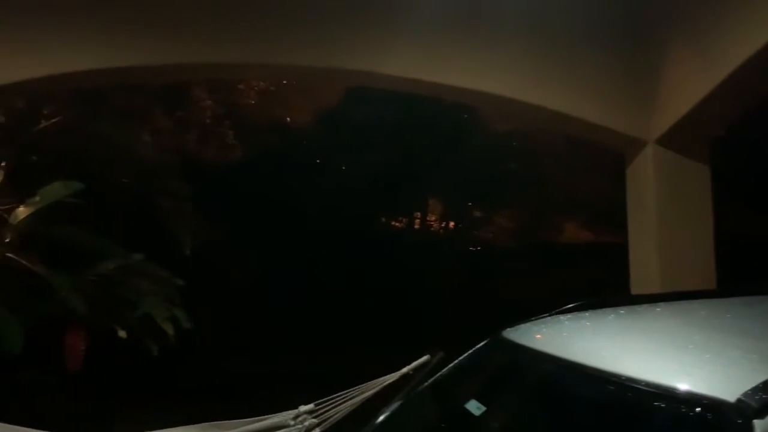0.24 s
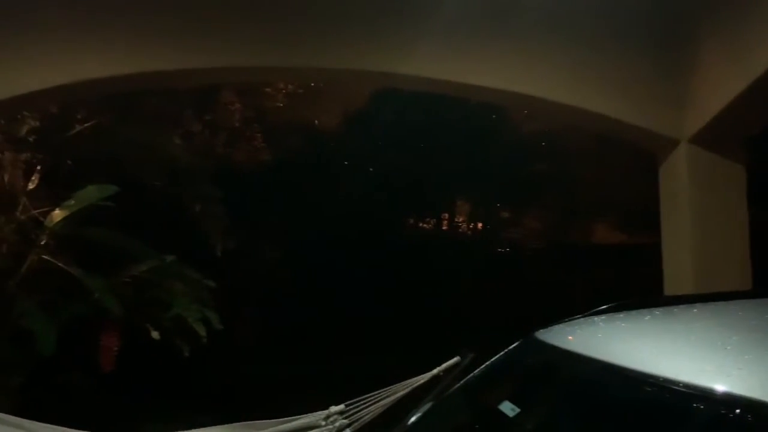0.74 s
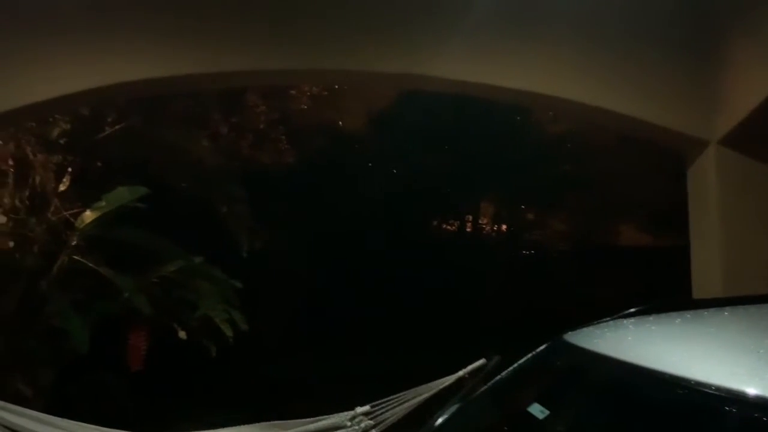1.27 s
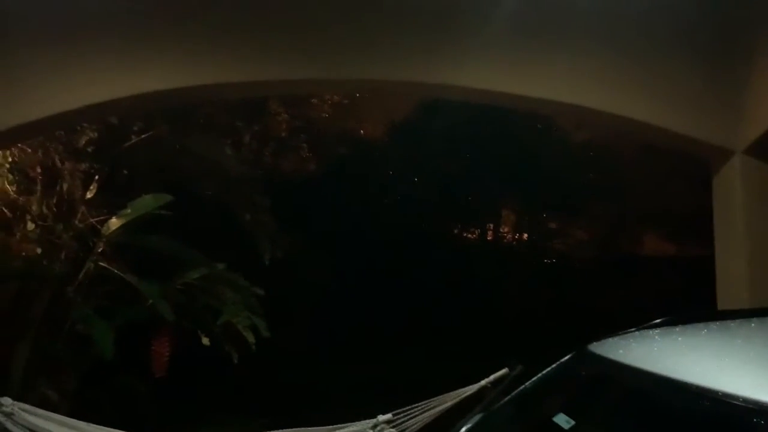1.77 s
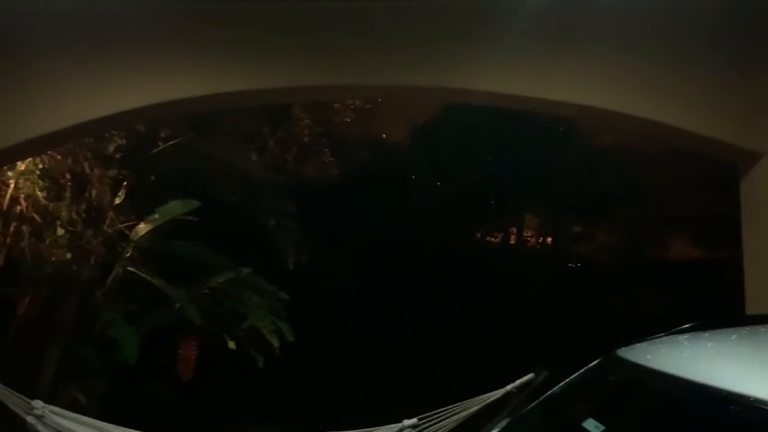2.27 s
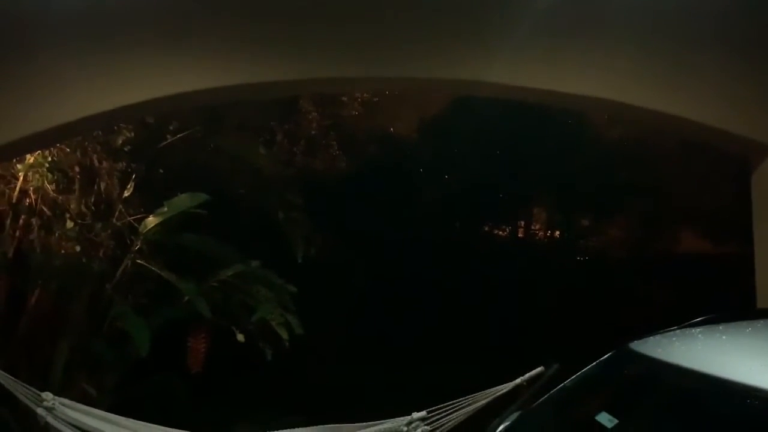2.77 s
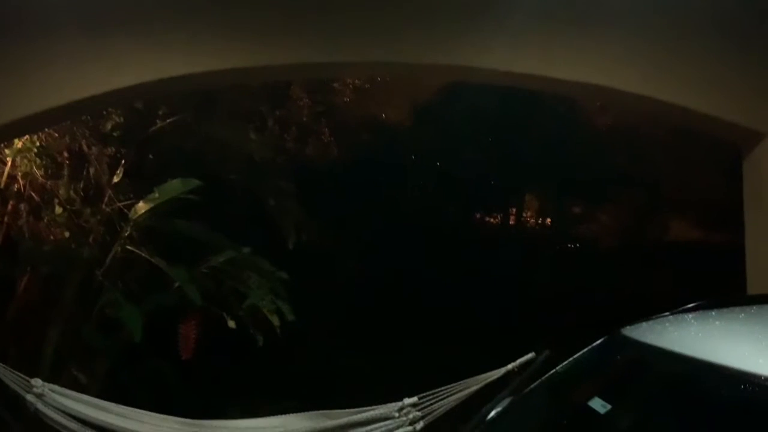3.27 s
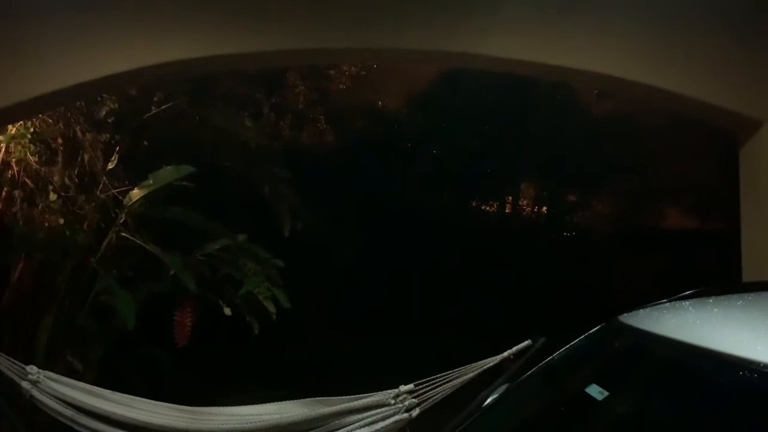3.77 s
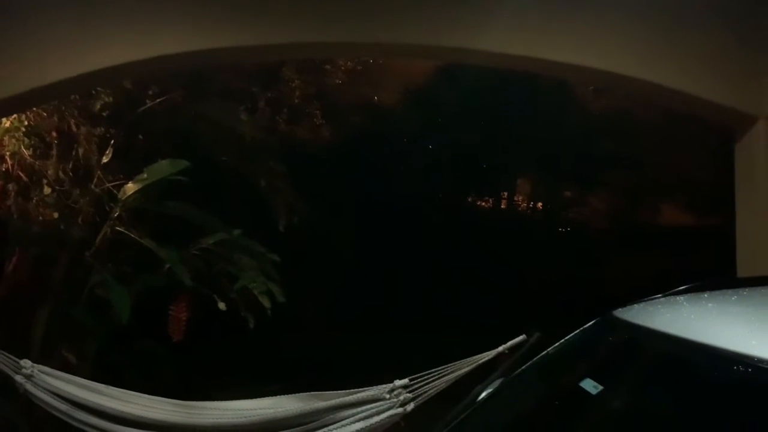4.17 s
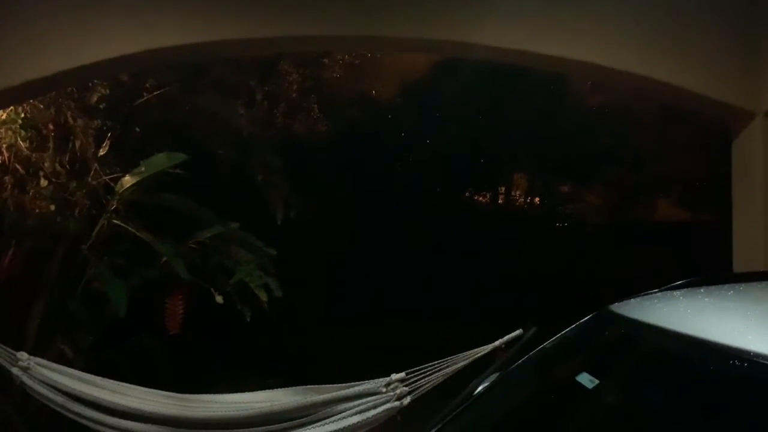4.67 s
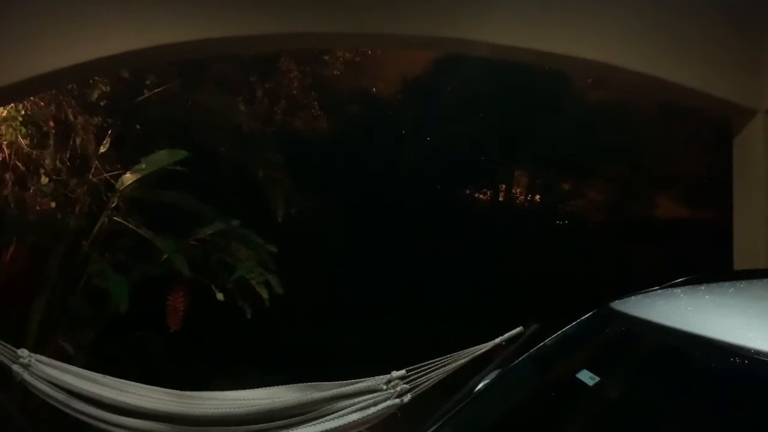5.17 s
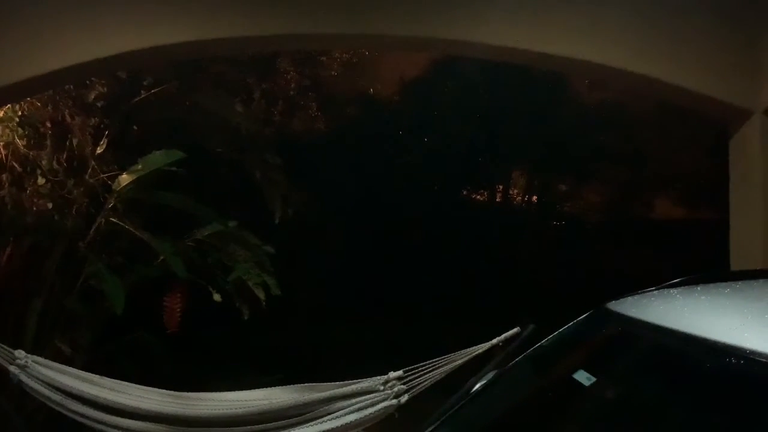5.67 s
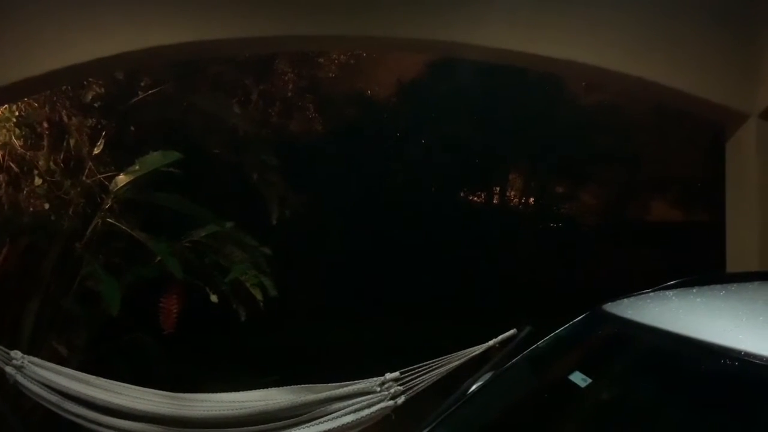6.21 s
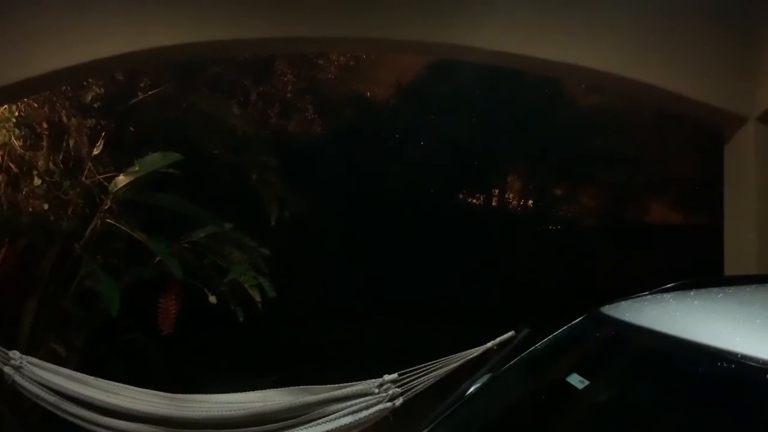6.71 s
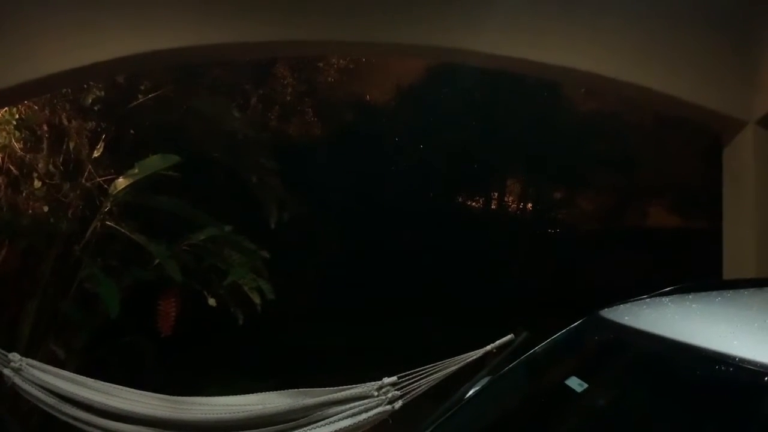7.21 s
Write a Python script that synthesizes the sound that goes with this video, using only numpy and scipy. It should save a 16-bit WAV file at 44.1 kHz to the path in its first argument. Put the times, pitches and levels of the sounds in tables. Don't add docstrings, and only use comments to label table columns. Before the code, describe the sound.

From the first moment to the end at about 7.4 seconds, cicadas hold a shrill, rasping, unbroken buzz around 6 kilohertz with a fainter sheen an octave higher. Four nearer singers swell and ebb over a blurred far crowd, each pulsing too fast to count, scattered by leaves and walls across a wide stereo space. Soft air hiss stirs slightly with breezes. A sharp thin cord tick comes at 2.0, a dull snap at 2.2, then a small wooden knock with rattling bounces at 2.65 to 2.8 and a dry twig snap at 2.9. More snaps fall at 3.3, 4.3, 5.6 and 6.4; cord ticks near 4.2, 5.1 and later. Distant traffic rumbles low, swelling around 5 and again at 6.6, with faint engine hums. A frog gives one weak falling chirp at 6.9, followed by a faint knock at 7.0.

```python
import sys
import numpy as np
from scipy import signal
from scipy.fft import rfft, irfft, next_fast_len
from scipy.io import wavfile
from scipy.ndimage import map_coordinates

SR = 44100
rng = np.random.default_rng(int(sys.argv[2]) if len(sys.argv) > 2 else 0)


def ratio(d):
    e = np.asarray(d, float) / 20
    return 10 ** e


def generate_wav(signal):
    frames = np.transpose(np.atleast_2d(signal))
    scaled = np.clip(frames, -1, 1) * 32767
    pcm = np.round(scaled).astype(np.int16)
    wavfile.write(sys.argv[1], SR, pcm)


N = 328545
TIME = np.arange(N) / SR
SIZE = next_fast_len(N + SR // 2, True)
HZ = np.fft.rfftfreq(SIZE, 1 / SR)

BELLY_PITCH = [0.9913, 0.997, 1.026, 0.985, 1.0075]
OCTAVE_DB = [-27, -36, -34, -13, -19]


def evened(x):
    return x / np.sqrt(np.mean(x ** 2) + 1e-20)


def read(points, hz):
    f, value = np.transpose(points)
    return np.interp(np.log(hz + 1), np.log(f + 1), value)


def over_time(points):
    return np.interp(TIME, *np.transpose(points))


def drift(rate_hz):
    coarse = TIME[::64]
    places = np.clip(coarse * rate_hz * 2, 0, 399)
    smooth = map_coordinates(rng.standard_normal(402), [places], order=3)
    return np.interp(TIME, coarse, smooth)


def add(mix, s, sound):
    part = mix[round(s * SR):][:len(sound)]
    part += sound[:len(part)]


def port_gains():
    # [f/Hz, share]
    from_right = [(40, 0.91), (150, 0.77), (300, 0.88), (450, 0.43), (620, 0.17), (900, 0.18), (1150, 0.3),
                  (1600, 0.79), (2450, 0.58), (2900, 0.12), (3500, 0.015), (4500, 1), (5250, 0.77),
                  (6200, 0.13), (7200, 0.48), (8500, 0.9), (12500, 1), (14500, 0.8)]
    # [f/Hz, share]
    from_left = [(300, 0.005), (3000, 0.03), (6000, 0.01), (9500, 0.1), (14500, 0.1)]
    # [f/Hz, phase/rad]
    turn = [(0, 0), (300, 1.75), (600, -.5), (900, -2.3), (1200, -4.7), (1800, -4.4), (2800, -5.1),
            (3300, -6.3), (4200, -8), (5300, -8.5), (7300, -8.8), (9000, -9.8), (10500, -9.1),
            (14500, -8.7)]
    # [f/Hz, level/dB]
    shadow = [(350, 0), (700, 3), (1200, 2), (2100, -2), (3500, -1.5), (5000, 5), (5800, -0.1),
              (10000, 0.5), (11800, 0.5), (14000, 0.5)]
    lag_s = 35 / 44100
    shares = np.clip([read(from_right, HZ), read(from_left, HZ)], 0, 1)
    shares = shares / np.maximum(shares.sum(0), 1)
    right, left = np.sqrt(shares)
    own = np.sqrt(np.maximum(1 - shares.sum(0), 0))
    late = np.exp(1j * (np.interp(HZ, *np.transpose(turn)) - 2 * np.pi * HZ * lag_s))
    gains = np.array([[right * late, left, own, 0 * own], [right, left * late, 0 * own, own]])
    return gains * ratio(read(shadow, HZ) * [[[.5]], [[-.5]]])


PORT_GAINS = port_gains()


def ports(paths):
    return np.einsum("cpf,pf->cf", PORT_GAINS, paths)


def echoes(t60, direct_db):
    t = np.arange(SR // 4) / SR
    tails = rng.standard_normal((4, len(t))) * ratio(-60 * t / t60)
    tails /= np.linalg.norm(tails, axis=1, keepdims=True)
    tails[[0, 2, 3], [0, 9, 60]] += ratio(direct_db)
    tails /= np.linalg.norm(tails, axis=1, keepdims=True)
    return ports(rfft(tails, SIZE))


def air():
    # [f/Hz, level/dB per Hz]
    hiss = [(150, -80.5), (300, -88.5), (480, -91), (900, -91.5), (1500, -93), (2300, -95), (3500, -98.5),
            (4300, -96), (7000, -84), (10500, -99), (14000, -102), (16000, -103)]
    # [t/s, level/dB]
    gusts = [(.4, 1.5), (1.43, 2), (2.88, 1), (4.5, 1), (6.3, 1)]
    gust_s = 0.18
    gust_db = sum(db * np.exp(-((TIME - s) / gust_s) ** 2) for s, db in gusts)
    rustle_db = .8 * drift(20.)
    stirred = rng.standard_normal((4, N)) * ratio(gust_db - gust_db.mean() + rustle_db)
    still = rng.standard_normal((4, N))
    leaves = np.exp(-(HZ / 4500) ** 4)
    noise = rfft(stirred, SIZE) * leaves + rfft(still, SIZE) * np.sqrt(1 - leaves ** 2)
    return ports(noise) * ratio(read(hiss, HZ)) * np.sqrt(SR / 2) * (HZ > 150)


def wavering_tone(rows):
    s, hz, db = np.transpose(rows)
    edge = np.clip(np.minimum(TIME - s[0] + 0.17, s[-1] - TIME + 0.045) / .05, 0, 1)
    turns = np.cumsum(np.interp(TIME, s, hz) + 1.08 * drift(2.9)) / SR
    level = ratio(np.interp(TIME, s, db) - 3.0 + 4.3 * drift(5.))
    return np.sqrt(2) * edge * level * np.sin(2 * np.pi * turns)


def traffic():
    # [f/Hz, level/dB]
    road = [(12, -49), (20, -21), (47, 1), (80, 4), (97, -1), (123, -4.5), (292, -23.5), (319, -22),
            (371, -34), (400, -36), (520, -49), (880, -120)]
    # [nearest t/s, half-width/s, level/dB]
    passes = [
        (4.0, 0.42, -57),
        (5.1, 0.84, -44),
        (6.6, 0.52, -48),
    ]
    # [t/s, f/Hz, level/dB]
    engines = [
        [(0, 126, -66), (1.1, 126.1, -67), (2.6, 124.7, -67), (3.6, 121.3, -72), (4.1, 122, -58.5),
         (4.6, 129, -61.5), (5.3, 139, -87)],
        [(1.1, 288.6, -72), (1.8, 276, -62), (2.6, 268.7, -69)],
        [(3.2, 267, -105), (4.1, 302, -71.5), (4.9, 343, -75)],
        [(3.3, 337.4, -68.5), (4.3, 379, -68), (4.6, 397, -89)],
        [(5.2, 86.25, -66), (5.8, 86, -54), (6.6, 87, -66)],
    ]
    idle_db = -53.5
    rumble = irfft(rfft(rng.standard_normal(N)) * ratio(read(road, np.fft.rfftfreq(N, 1 / SR))), N)
    power = ratio(idle_db) ** 2
    for s, half_s, db in passes:
        power = power + ratio(db) ** 2 / (1 + ((TIME - s) / half_s) ** 2) ** 2
    out = evened(rumble) * np.sqrt(power) * ratio(0.5 * drift(7.) - 7.5)
    for rows in engines:
        out += wavering_tone(rows)
    return rfft(out, SIZE) * echoes(0.0069, direct_db=8.5)


def frog():
    # [t/s, f/Hz, level/dB]
    chirp = [
        (6.85, 1760, -79),
        (6.92, 1650, -59),
        (7.0, 1500, -77),
    ]
    return rfft(wavering_tone(chirp), SIZE) * echoes(0.0069, direct_db=8.5)


def snap(db, hz, width_hz, t60):
    t = np.arange(SR // 4) / SR
    burst = rng.standard_normal(len(t)) * ratio(-19.0 - 60 * t / t60)
    burst[40] = 1
    band = np.exp(-((np.fft.rfftfreq(len(t), 1 / SR) - hz) / (width_hz / 2)) ** 2)
    burst = irfft(rfft(burst) * band, len(t))
    return ratio(db) * burst / abs(burst).max()


def cord():
    tick_at = [2.033, 2.046, 2.76, 4.128, 4.272, 4.29, 5.138, 5.195, 5.47, 5.79, 6.63, 7.35]
    tick_db = [-28, -37, -50, -40, -37, -42, -27, -37, -50, -50, -41, -39]
    out = np.zeros(N)
    for s, db in zip(tick_at, tick_db):
        add(out, s, snap(db, hz=16000, width_hz=12000, t60=.1))
    return rfft(out, SIZE) * echoes(.15, direct_db=6.0)


def knock(db, pitch, rattle_t60):
    # [f/Hz, level/dB, t60/s]
    wood = [(300, -15, .04), (560, -14, .03), (700, -1, .04), (904, 0, .045), (1050, -3, .035),
            (1427, -3, .035), (1600, -6, .03), (1900, -8, .025), (2300, -10, .02), (2850, -8, .025),
            (3400, -10, .02)]
    t = np.arange(SR // 4) / SR
    ring = sum(ratio(d - 60 * t / t60) * np.sin(2 * np.pi * hz * pitch * t) for hz, d, t60 in wood)
    blows = rng.standard_normal(len(t)) * ratio(-60 * t / np.clip(rattle_t60, .02, .16) - 16.5)
    blows[0] = 1
    return ratio(db) * signal.fftconvolve(blows, ring)


def porch():
    knock_at = [2.645, 2.66, 2.715, 2.805, 7.02]
    # [level/dB, pitch factor, rattle t60/s]
    knocks = [
        (-46.5, 0.978, 0.089),
        (-52, 1.1, 0.23),
        (-56, 1.1, 0.072),
        (-69, 0.95, 0.04),
        (-59.5, 1.07, 0.1),
    ]
    snap_at = [2.23, 2.643, 2.931, 2.933, 3.31, 4.33, 5.58, 6.316, 6.44]
    # [peak level/dB, centre f/Hz, width/Hz, tail t60/s]
    snaps = [
        (-50, 1000, 740, 0.12),
        (-43, 2400, 2400, 0.3),
        (-36.5, 2800, 1260, 0.027),
        (-41.5, 4200, 1500, 0.044),
        (-44, 1600, 2200, .07),
        (-46, 2300, 1200, .04),
        (-42, 1900, 6200, .15),
        (-44, 1200, 3700, 0.014),
        (-49, 1660, 650, 0.033),
    ]
    out = np.zeros(N)
    for s, row in zip(knock_at, knocks):
        add(out, s, knock(*row))
    for s, row in zip(snap_at, snaps):
        add(out, s, snap(*row))
    straight = ratio([[0], [-2]])
    return rfft(out, SIZE) * (straight + ratio(-0.5) * echoes(0.36, direct_db=-13))


def buzz(rate_hz, wobble):
    # [share of cycle, level/dB]
    clicks = [
        (0, 0.5),
        (.27, -1.5),
        (.52, -4.5),
        (0.782, -3.5),
    ]
    k = np.arange(4097)
    burst = 0
    for at, db in clicks:
        jittered = at + 0.02043 * rng.standard_normal()
        burst = burst + ratio(db) * np.exp(-2j * np.pi * k * jittered)
    flattened = (burst + 0.34) / (abs(burst) + 1.8)
    cycle = evened(irfft(flattened * (k > 25) * (k < 125)))
    turns = np.cumsum(rate_hz) / SR + wobble * drift(18.) + rng.random()
    return np.interp(turns % 1 * 8192, np.arange(8193), np.r_[cycle, cycle[0]])


def scattered(x, belly, octave_db, sway_hz, t60):
    # [f/Hz, level/dB]
    body = [(4000, -120.5), (4500, -35), (5100, -30), (5500, -5.5), (5900, -2.5), (6300, 4.5), (6600, 2.5),
            (7000, -8), (7500, -24.5), (8500, -35.5), (9500, -34.5), (10300, -94), (11500, -40)]
    # [f/Hz, level/dB]
    octave = [(10000, -46), (11200, -12), (11800, -4), (12400, 2), (13200, -5), (13800, -20), (14600, -53),
              (16000, -34)]
    angle = 2 * np.pi * (sway_hz * TIME + rng.random()) + 0.71 * drift(1.5)
    heard = sum(rfft(x * w, SIZE) * echoes(t60, direct_db=-6.5) for w in (np.cos(angle), np.sin(angle)))
    colour = ratio(read(body, HZ / belly)) + ratio(read(octave, HZ / belly) + octave_db)
    colour *= np.sqrt(np.mean((HZ > 3300) & (HZ < 16600)) / np.mean(colour ** 2))
    return heard * colour


def cicada_crowd():
    # [t/s, level/dB]
    crowd_level = [(0, -33.5), (1, -37), (2, -43.5), (3, -35.5), (4, -36.5), (5, -36.5), (6, -41.5),
                   (7.45, -35.5)]
    crowd = 0
    for hz in np.linspace(126, 143, 12):
        crowd = crowd + buzz(hz + .7 * drift(.4), wobble=0.0064) * ratio(2.3 * drift(1.237))
    crowd = evened(crowd) * ratio(over_time(crowd_level) + 1.0 * drift(11.))
    return scattered(crowd, BELLY_PITCH[4], OCTAVE_DB[4], sway_hz=1.2, t60=0.21)


def effort(singer):
    # [singer 0-3, start t/s, end t/s, level/dB]
    phrases = [
        (0, -.5, 2.7, -33.5),
        (0, 5.5, 4.7, -29),
        (0, 4.0, 7.9, -32),
        (1, 0.33, 3.64, -35.5),
        (1, 3.9, 5.8, -34),
        (2, 2.1, 2.27, -30.5),
        (2, 4, 3.5, -43),
        (2, 5, 6.5, -37.5),
        (3, -.5, 2.42, -40.5),
    ]
    rest_db = [-31.5, -40.5, -52, -95]
    swell_s = 0.32
    swells = [ratio(db) * np.clip(np.minimum(TIME - start, end - TIME) / swell_s, 0, 1)
              for who, start, end, db in phrases if round(who) == singer]
    return np.maximum(np.max(swells, axis=0), ratio(rest_db[singer]))


def near_cicadas():
    # [t/s, f/Hz]
    rate_a = [(0, 133.25), (1.15, 132.9), (1.8, 133.45), (2.4, 133.72), (3.0, 135.0), (3.3, 135.4),
              (4.55, 133.63), (6.0, 132.96), (7.45, 133.12)]
    rate_b = [(1.8, 133.44), (3.4, 131.9), (4.85, 131.26), (5.7, 133.06)]
    rate_c = [(.5, 135.92), (2.2, 134.56), (3.45, 134.0), (4.2, 135.32), (4.65, 135.68), (6.0, 134.62),
              (7.45, 134.0)]
    rate_d = [(0, 139.75), (1.3, 138.38), (1.85, 138.12), (2.36, 137.1)]
    out = 0
    for singer, rate in enumerate((rate_a, rate_b, rate_c, rate_d)):
        song = buzz(over_time(rate), wobble=0.0025) * effort(singer) * ratio(1.48 * drift(10.))
        out = out + scattered(song, BELLY_PITCH[singer], OCTAVE_DB[singer], sway_hz=0.5508, t60=0.32)
    return out


def scene():
    background = air() + traffic() + frog()
    close_by = cord() + porch()
    cicadas = cicada_crowd() + near_cicadas()
    return irfft(background + close_by + cicadas, SIZE)[:, :N]


def roll_off(x):
    return signal.sosfilt(signal.butter(12, 15660, fs=SR, output="sos"), x)


def record(dry):
    return roll_off(dry)


dry = scene()
out = record(dry)
generate_wav(out)
```